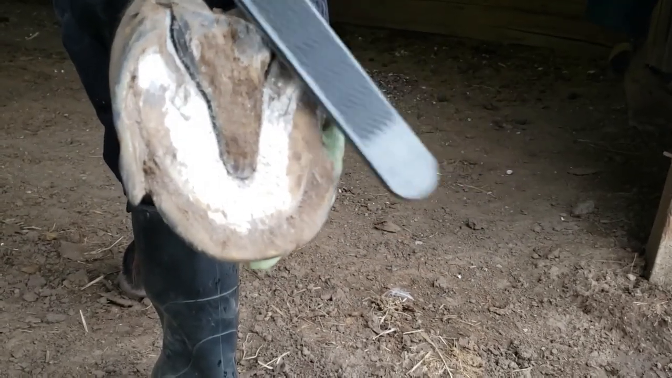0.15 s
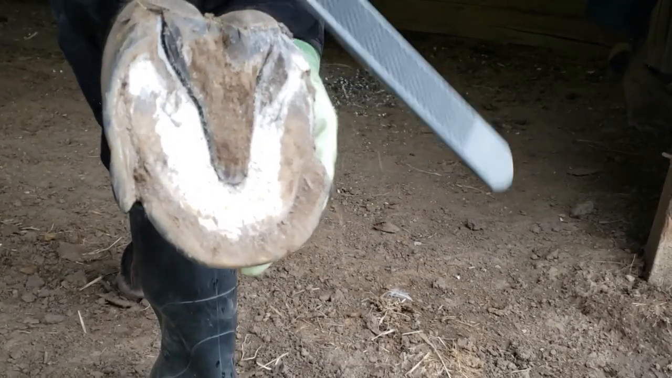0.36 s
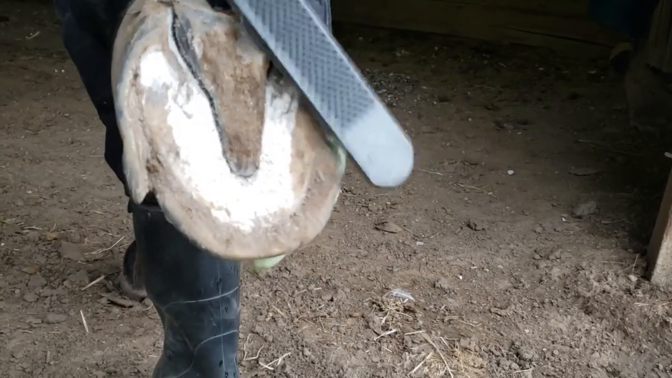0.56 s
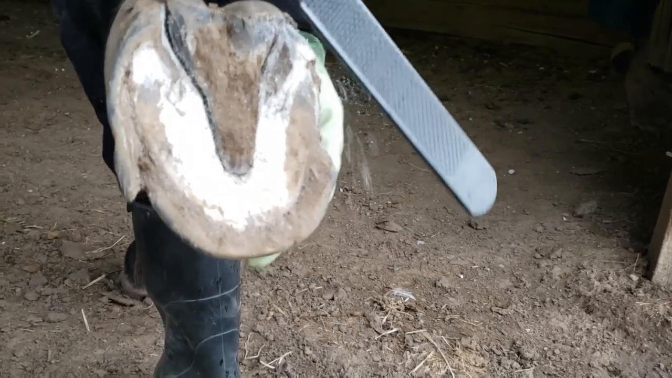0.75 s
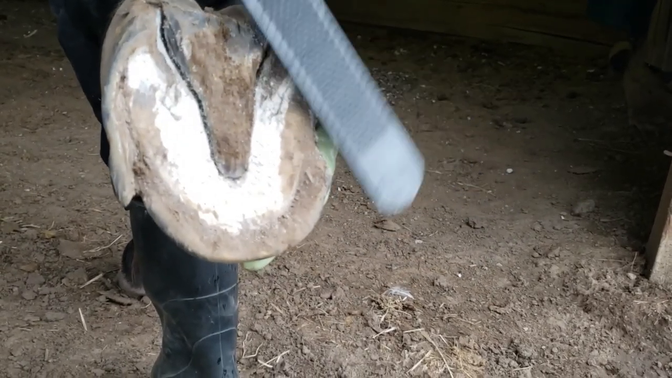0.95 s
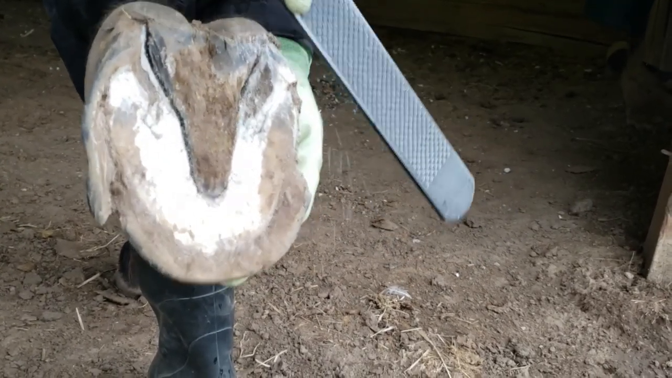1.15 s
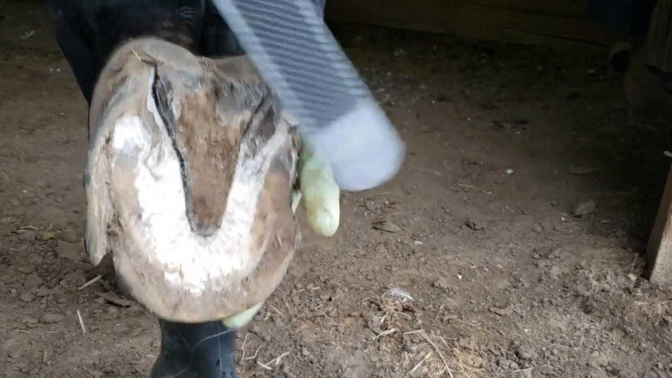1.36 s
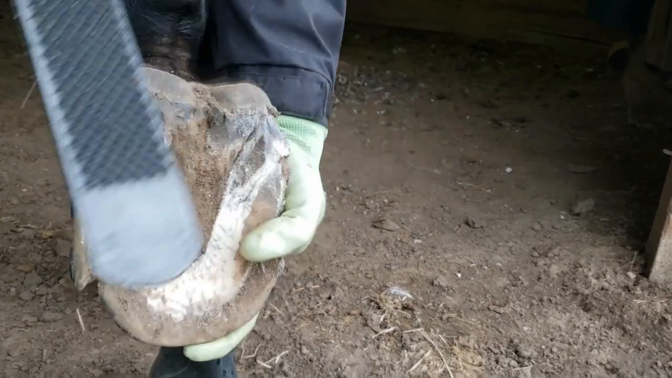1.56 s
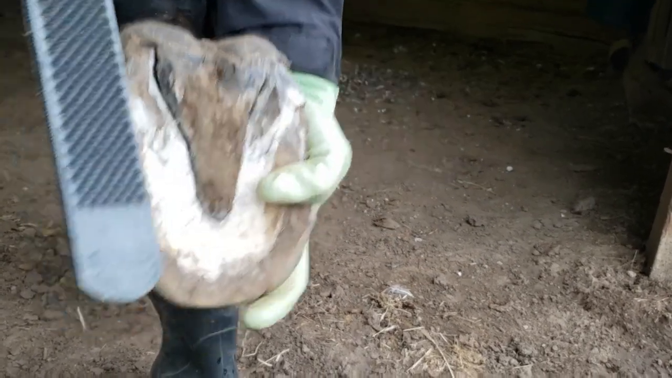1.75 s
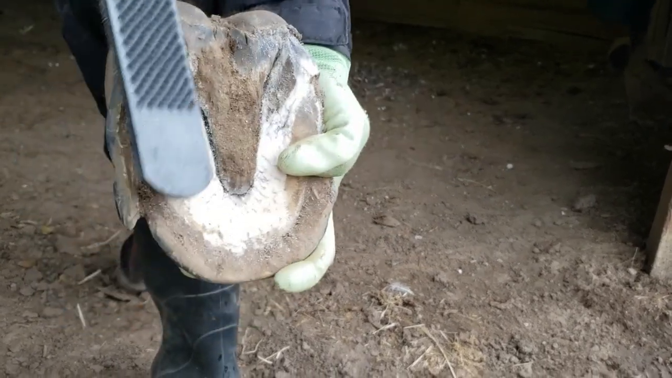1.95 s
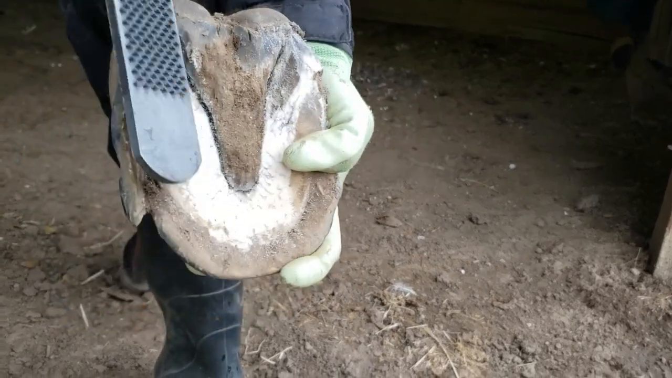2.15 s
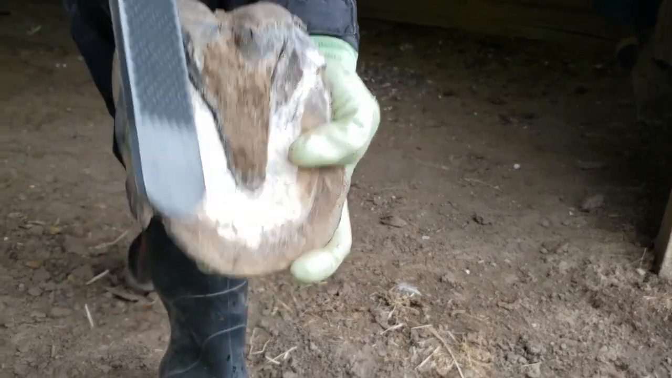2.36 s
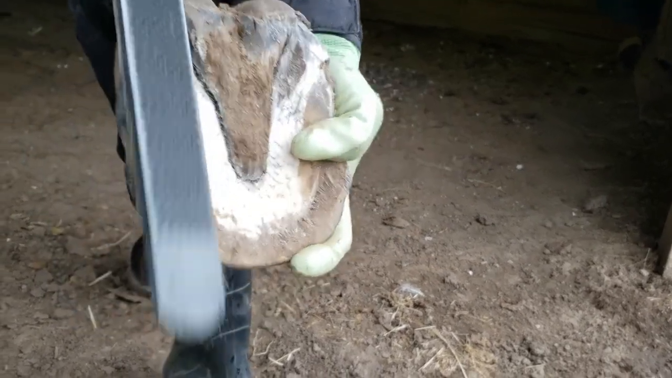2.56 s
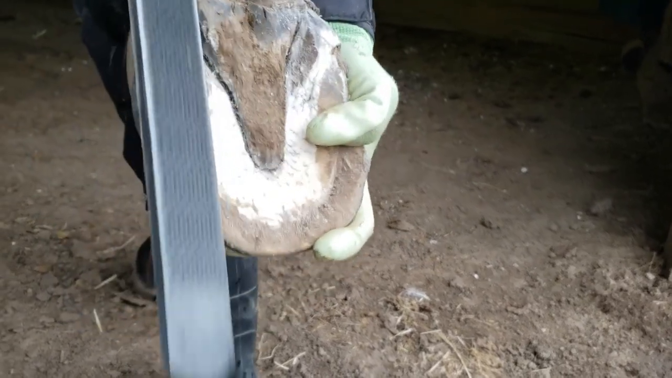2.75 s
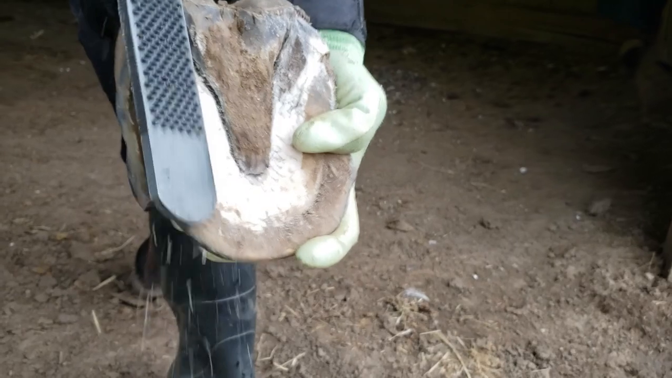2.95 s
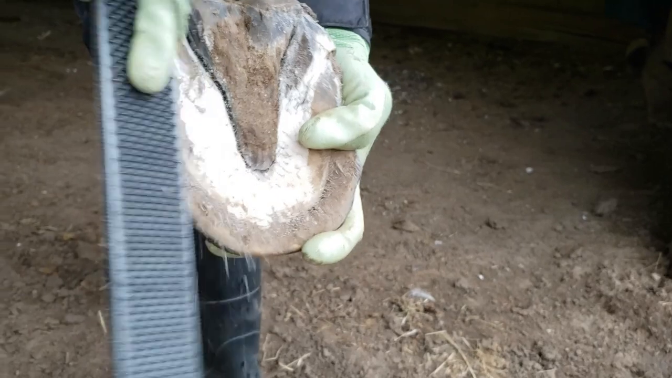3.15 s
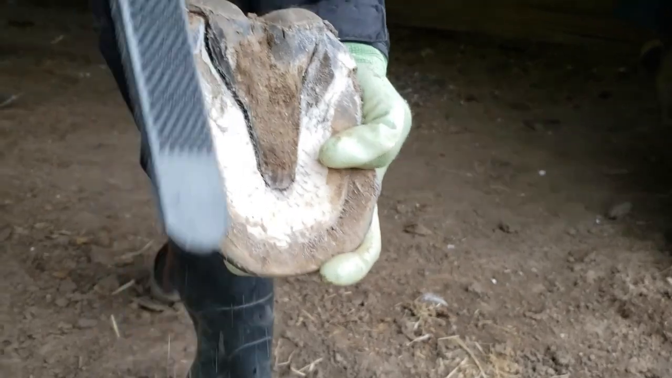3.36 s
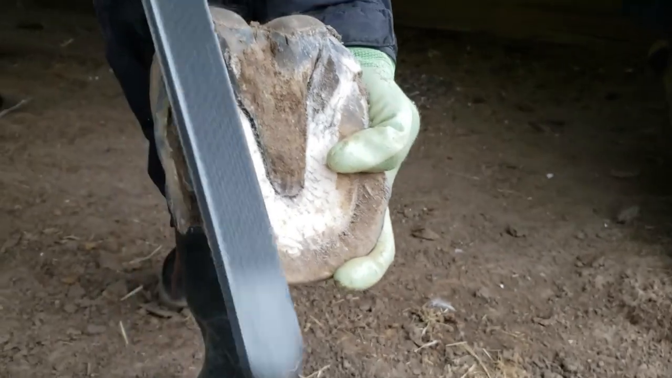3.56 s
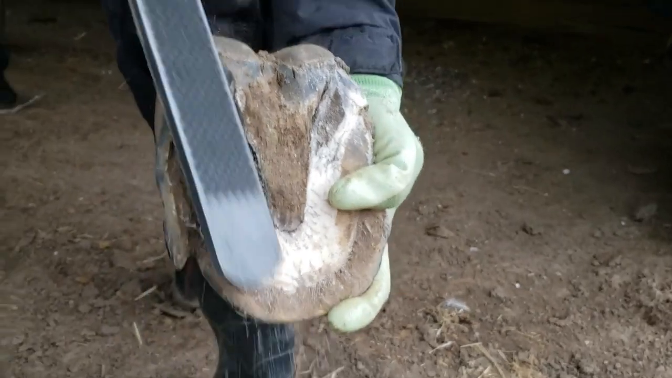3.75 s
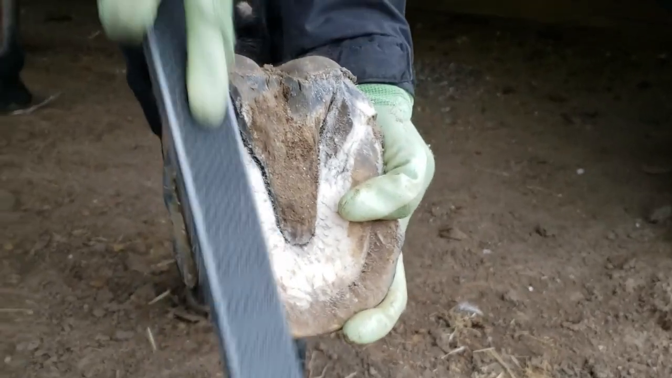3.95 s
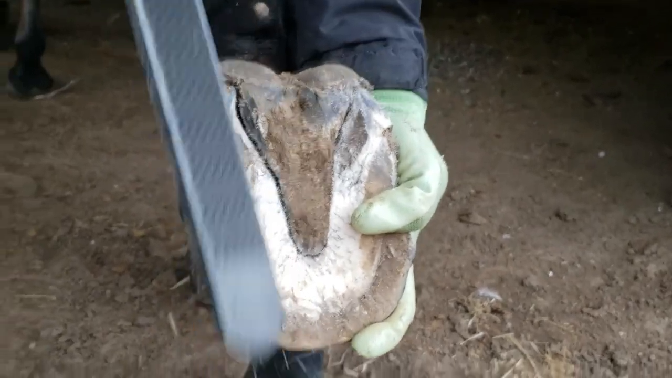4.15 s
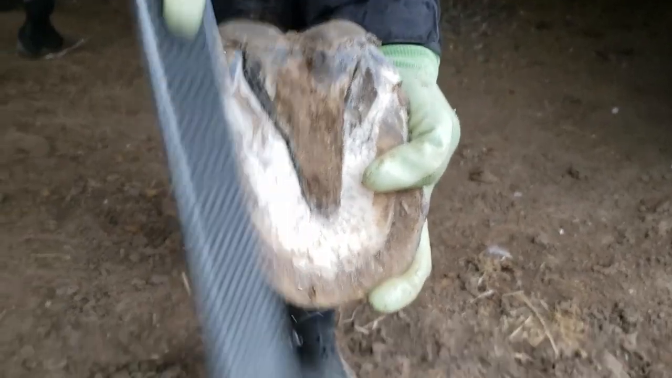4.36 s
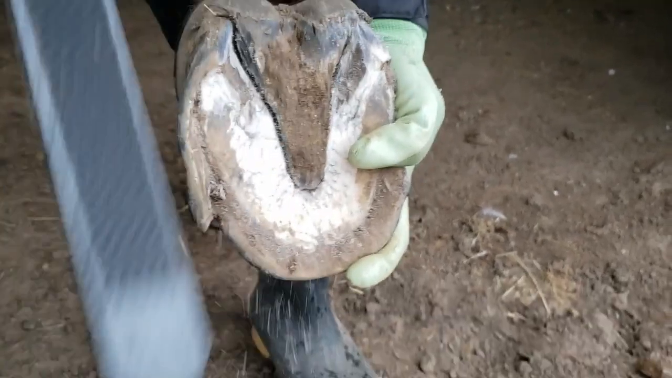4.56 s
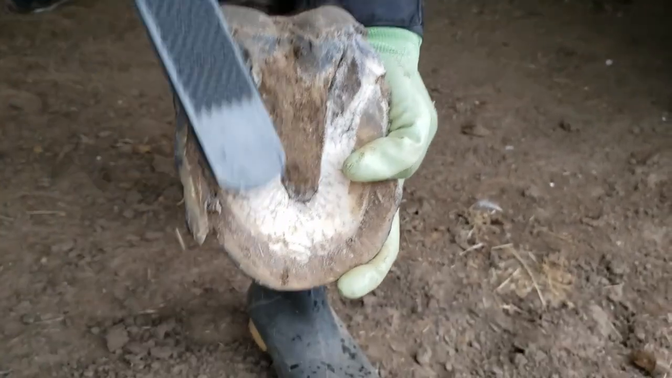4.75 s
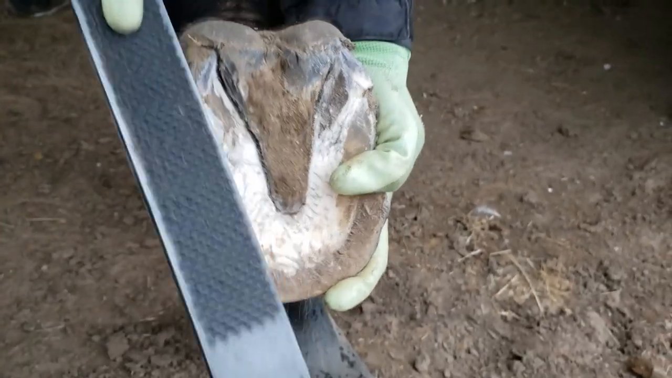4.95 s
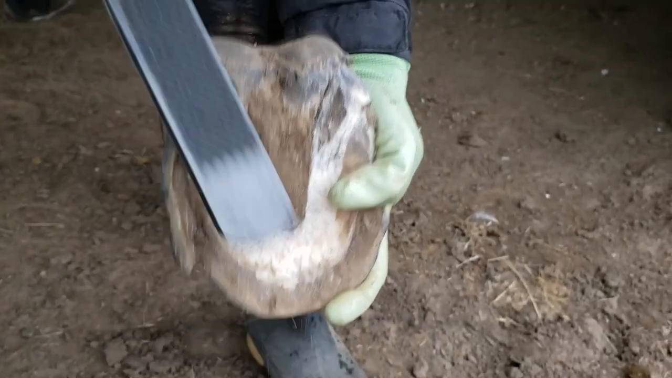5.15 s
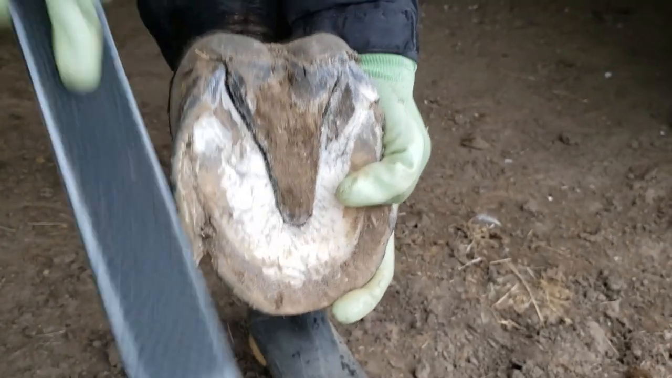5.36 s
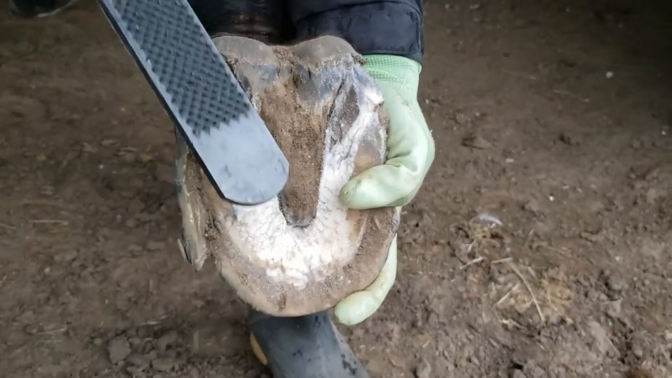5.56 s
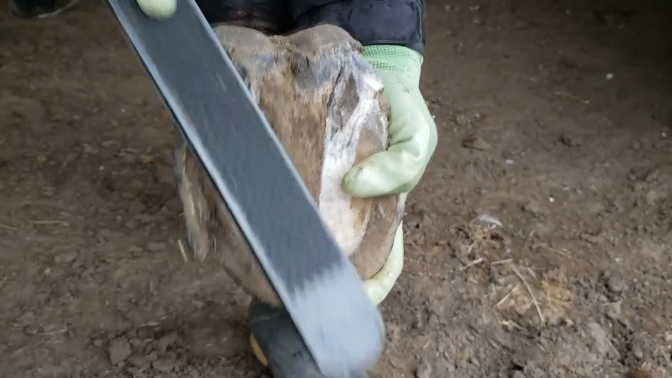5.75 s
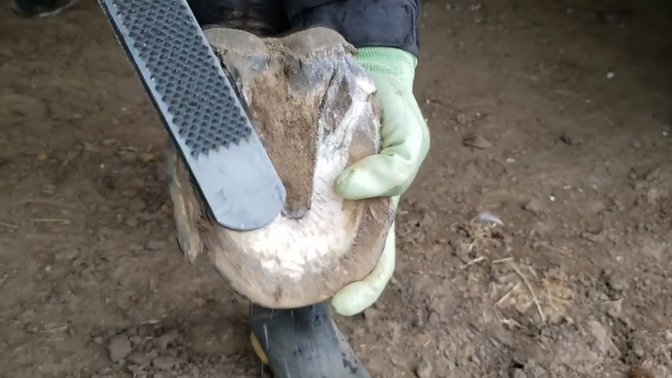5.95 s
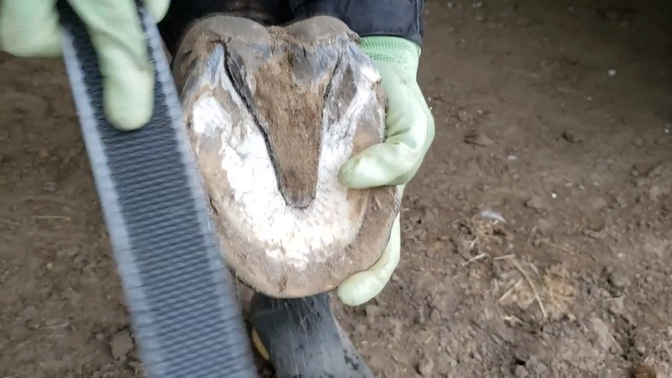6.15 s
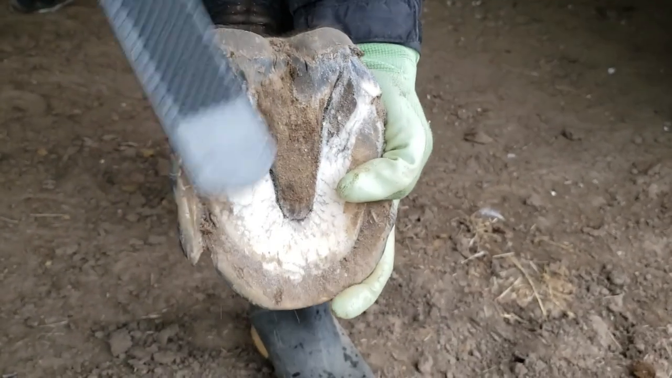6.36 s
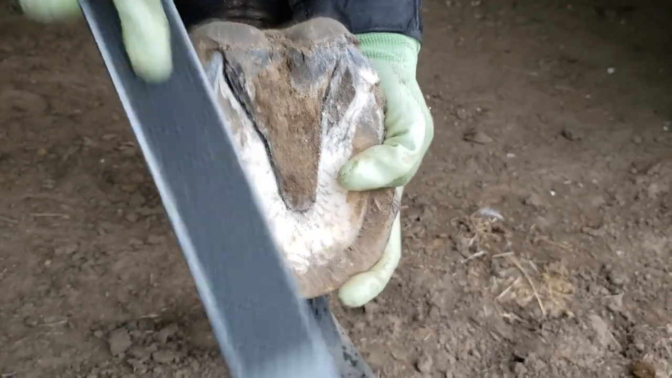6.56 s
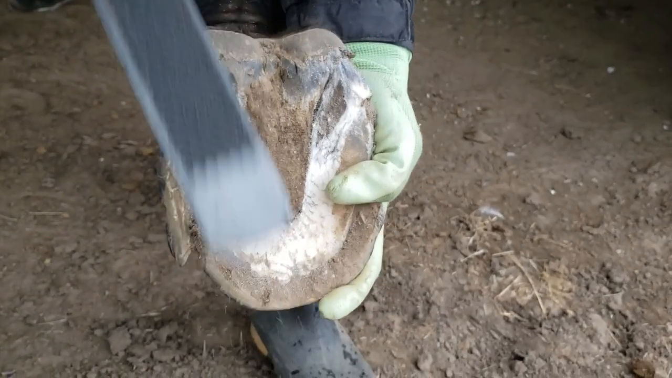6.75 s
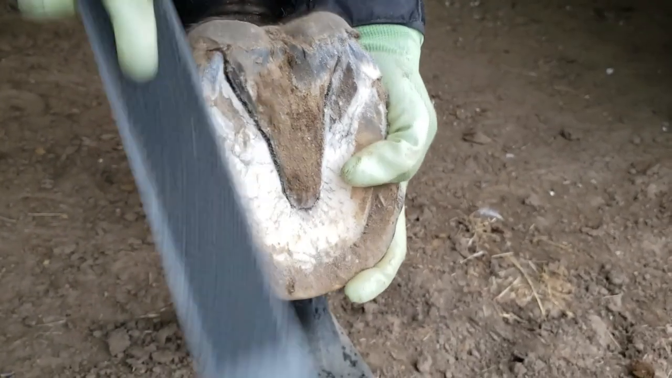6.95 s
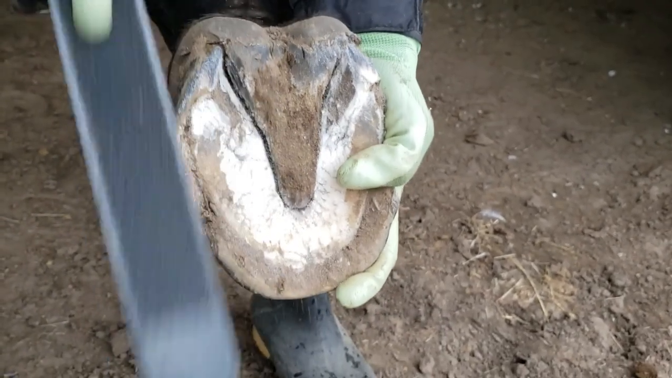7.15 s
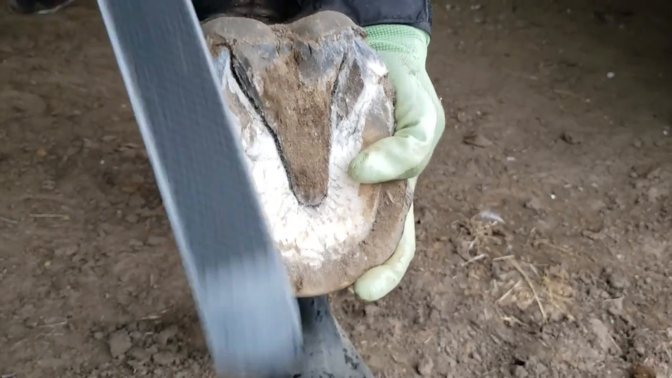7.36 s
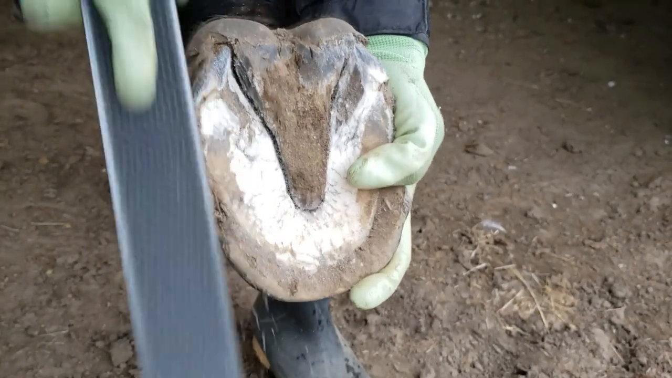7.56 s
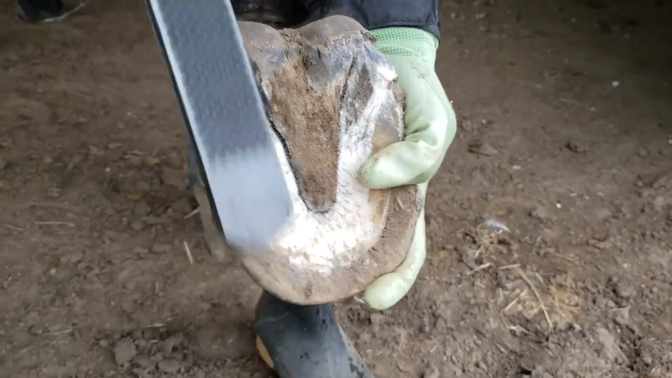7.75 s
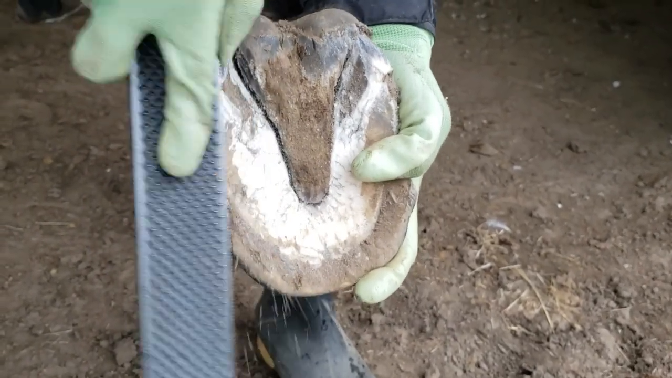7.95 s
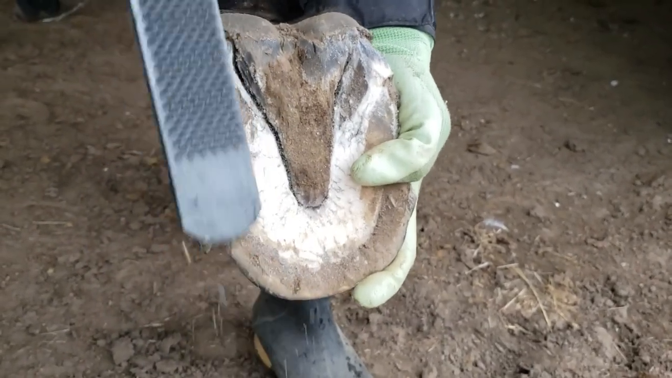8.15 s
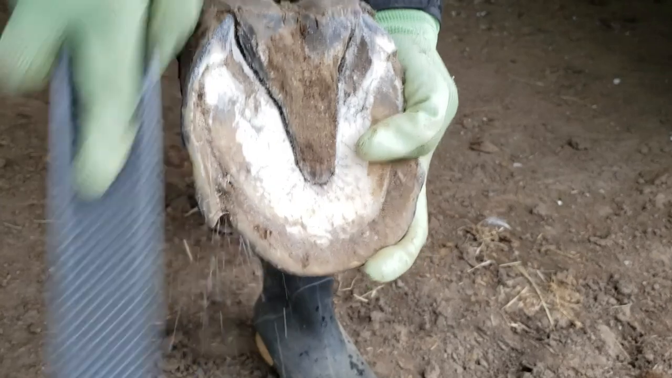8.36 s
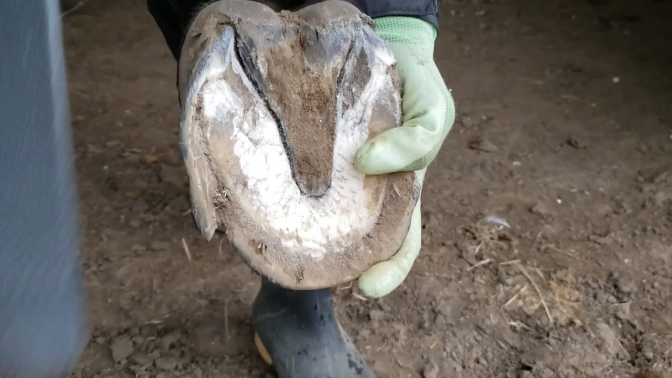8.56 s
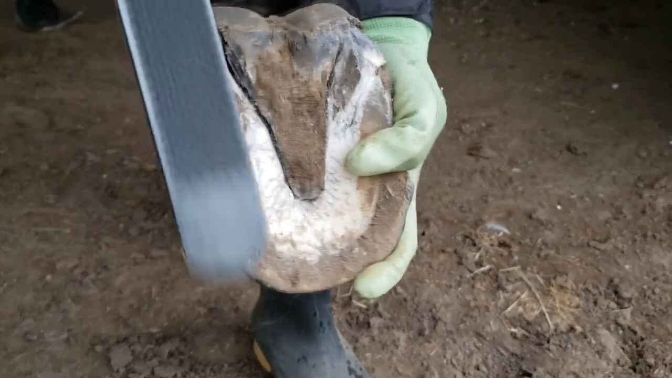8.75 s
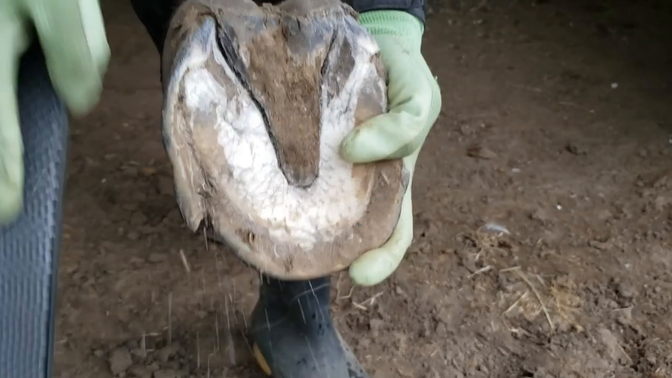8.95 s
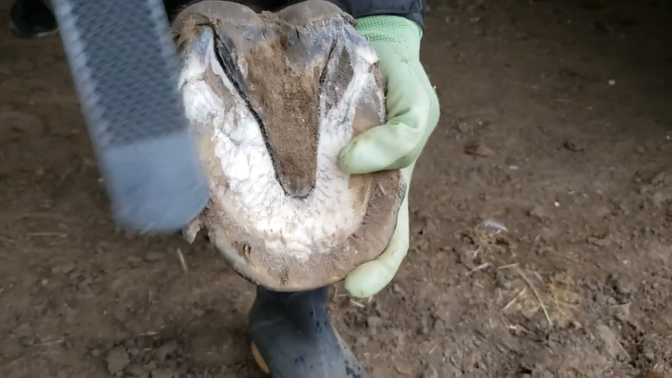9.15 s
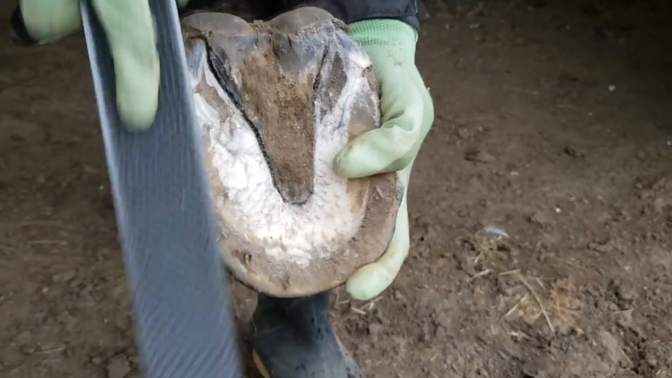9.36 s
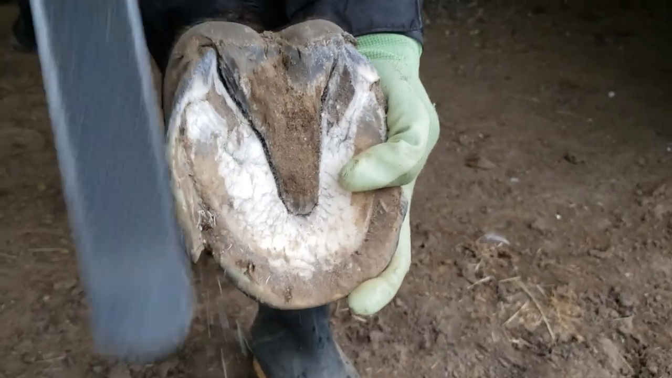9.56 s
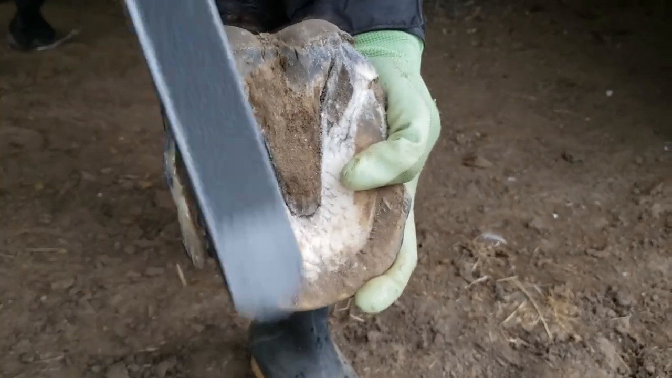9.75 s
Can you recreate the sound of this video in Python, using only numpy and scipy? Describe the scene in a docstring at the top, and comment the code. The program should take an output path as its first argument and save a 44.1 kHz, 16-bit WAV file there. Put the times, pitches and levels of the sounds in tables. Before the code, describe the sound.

A close stereo sound of a steel rasp working a horse's hoof in an open shelter, with a very short scattered tail and faint low outdoor rumble. From 0.15 to 1.2 seconds come three dull, grainy scrapes, chattering tooth by tooth, with light hissing returns and slight taps. From 1.2 to 2.3 only soft rubbing is heard as the rasp is turned, with a faint tick at 1.8. At 2.35 brighter strokes begin, quick and hissy with a thin steel ring, roughly three then two per second. From about 4.7 they deepen into loud, crunchy bites with hoof thud and metallic ringing, strongest around 5.2 to 7; knocks hit at 5.2 and, harder, near 6.9. Strokes continue steadily and slightly slower, with knocks at 8.6 and 9.1, the hardest crack at 9.2, and a last push near 9.8.

```python
"""Rasping a horse's hoof

A farrier files a hoof with a steel rasp, close to the microphone in an open shelter.
On each push the teeth bite: random fractures crumble the horn, caught tooth rows thud the hoof, the bar rings.
The draw back is mostly hiss from tooth tips. After three dull scrapes the rasp is turned over with soft rubbing.
Now and then it knocks on the hoof, ringing wall and bar; short scattered tails and low outdoor air surround it."""
import sys
import numpy as np
from scipy import signal
from scipy.fft import rfft, irfft
from scipy.io import wavfile
from scipy.ndimage import uniform_filter1d

SR = 44100
rng = np.random.default_rng(int(sys.argv[2]) if len(sys.argv) > 2 else 0)


def waveform_to_disk(signal):
    """Save audio, clipped to [-1, 1], as 16-bit WAV at the path in sys.argv[1]."""
    frames = np.transpose(np.atleast_2d(signal))
    scaled = np.clip(frames, -1, 1) * 32767
    samples = np.round(scaled).astype(np.int16)
    wavfile.write(sys.argv[1], SR, samples)


N = 432180
TIME = np.arange(N) / SR


def gain_of(db):
    """Decibels to amplitude."""
    return 10 ** (np.asarray(db) / 20)


def evened(x):
    """Scales to an rms of one."""
    return x / np.sqrt(np.mean(x ** 2) + 1e-20)


def wander(cutoff_hz):
    """Slow random curve of rms one: noise low-passed around cutoff_hz."""
    f_hz = np.fft.rfftfreq(N, 1 / SR)
    lowpass = 1 / (1 + (f_hz / cutoff_hz) ** 4)
    return evened(irfft(rfft(rng.standard_normal(N)) * lowpass, N))


def colour(x, points, size=4096):
    """Minimum-phase filter through (frequency_hz, gain_db) points."""
    point_hz, point_db = np.transpose(points)
    bin_hz = abs(np.fft.fftfreq(size, 1 / SR)) + 1
    log_gain = np.log(gain_of(np.interp(np.log(bin_hz), np.log(point_hz), point_db)))
    taps = np.fft.ifft(np.exp(np.conj(signal.hilbert(log_gain)))).real
    return signal.oaconvolve(x, taps[:size // 2])[:N]


def ring(x, mode_hz, width_hz):
    """One decaying mode; its gain passes white noise at equal power."""
    radius = np.exp(-np.pi * abs(width_hz) / SR)
    pole = radius * np.exp(2j * np.pi * mode_hz / SR)
    return signal.lfilter([np.sqrt(2 * (1 - radius * radius))], [1, -pole], x).imag


def ring_modes(drive, modes):
    """Sum of decaying modes (mode_hz, width_hz, level_db) under one drive."""
    return sum(gain_of(db) * ring(drive, hz, width) for hz, width, db in modes)


# one row a stroke, pushes timed; the draw before it starts where the last push ended:
# push_start_s, push_end_s, bite_db, pressure_place (0-1), pressure_length (0-1), rows_per_s,
# thud_db (re bite), ring_db (re bite), push_hiss_db, draw_hiss_db
STROKES = [(.152, .362, -45, 0.39, .22, 76, -2.5, -22, -44.5, -48.5),
           (.575, .815, -43.5, 0.34, .26, 78, -3.5, -19, -47.5, -50),
           (.995, 1.199, -47, 0.33, 0.21, 78, -2, -17, -52, -62),
           (2.353, 2.542, -51, 0.49, 0.49, 162, 1, 5.5, -39, -72),
           (2.689, 2.854, -48, 0.4, 0.43, 153, -1.5, 6, -41, -45),
           (2.992, 3.218, -48.5, 0.35, .6, 132, -6, 2, -39.5, -43.5),
           (3.48, 3.681, -49.5, 0.42, 0.56, 117, 3, 2, -42, -49),
           (3.85, 4.052, -44.5, 0.49, 0.35, 204, 3.5, -5.5, -40, -44.5),
           (4.275, 4.489, -49, 0.41, 0.37, 107, 2, 4, -40, -48),
           (4.748, 4.994, -41.5, 0.58, 0.24, 99.5, 6, 2, -40.5, -48),
           (5.172, 5.356, -34, 0.43, 0.19, 100, 1.5, 4.5, -37, -48.5),
           (5.602, 5.844, -43.5, 0.64, 0.2, 93.3, 5, 4, -42, -48),
           (5.994, 6.208, -35.5, 0.45, 0.23, 108.6, 2, 0.5, -37.5, -45),
           (6.433, 6.671, -36.5, 0.41, 0.23, 102, 6, 5, -37, -44.5),
           (6.868, 7.094, -36, 0.44, 0.29, 86, 3.5, 2, -36, -45.5),
           (7.31, 7.531, -40.5, 0.42, 0.32, 108.6, 2, -0.5, -36.5, -44),
           (7.748, 7.998, -43, 0.47, 0.44, 125, 2, 0.5, -38, -43.5),
           (8.209, 8.445, -39.7, 0.47, 0.18, 155, -3, 2, -33, -44),
           (8.713, 8.974, -43.5, 0.45, 0.3, 123, 0, 0.5, -37, -46),
           (9.218, 9.46, -45.5, 0.48, 0.43, 96, -1, 2.5, -38.5, -47),
           (9.704, 9.93, -43, .38, 0.29, 95, -1, 1, -40, -47)]
FIRST_DRAW_S = -0.07
# draw: the hand leans in towards its end; a quicker draw bites more
DRAW_S, DRAW_BITE_DB, QUICK_POWER, DRAW_PLACE, DRAW_LEAN = 0.21, -11, 2.4, 0.98, 0.96
DRAW_ROWS_PER_S, DRAW_THUD_DB, DRAW_RING_DB, DRAW_SCRAPE_DB = 125, -4, 0.5, -14
SCRAPE_DB = -5  # push scrape re its hiss


def passes():
    """Splits strokes into draws and pushes: start_s, end_s, hiss_db, bite_db, place, lean,
    rows_per_s, thud_db, scrape_db, ring_db."""
    rows, last_end_s = [], FIRST_DRAW_S
    for start_s, end_s, bite_db, place, lean, rate, thud_db, ring_db, push_db, draw_db in STROKES:
        quickness = DRAW_S / (start_s - last_end_s)
        draw_bite_db = draw_db + DRAW_BITE_DB + QUICK_POWER * 20 * np.log10(quickness)
        rows.append((last_end_s, start_s, draw_db, draw_bite_db, DRAW_PLACE, DRAW_LEAN,
                     DRAW_ROWS_PER_S, DRAW_THUD_DB, DRAW_SCRAPE_DB, DRAW_RING_DB))
        push_scrape_db = push_db - bite_db + SCRAPE_DB
        rows.append((start_s, end_s, push_db, bite_db, place, lean,
                     rate, thud_db, push_scrape_db, ring_db))
        last_end_s = end_s
    return np.array(rows)


# speed left at a turn, how soon full speed comes, pressure of a resting hand
CREEP, BRISK, RESTING = 0.04, 1.77, 0.06
USUAL_ROWS_PER_S, USUAL_BITE_DB = 110, -42
DAMPING_DB_PER_DB = 0.5024  # a harder bite damps the upper bar modes


def arm(hiss_power=1.0, press_power=0.39):
    """Speed and hand pressure along each pass set hiss, bite and the tone of the cut."""
    rows = passes()
    now = np.searchsorted(rows[1:, 0], TIME)
    start_s, end_s, hiss_db, bite_db, place, lean, *tone = rows[now].T
    along = np.clip((TIME - start_s) / (end_s - start_s), 0, 1)
    speed = CREEP + (1 - CREEP) * np.tanh(BRISK * np.sin(np.pi * along)) / np.tanh(BRISK)
    pressure = RESTING + (1 - RESTING) * np.exp(-((along - place) / lean) ** 2)
    damping_db = DAMPING_DB_PER_DB * (bite_db - USUAL_BITE_DB)
    hiss = gain_of(hiss_db) * speed ** hiss_power * pressure ** press_power
    bite = gain_of(bite_db) * speed * pressure
    return hiss, bite, tone + [damping_db]


def grains(per_s, spread_db):
    """Tiny fractures of random moment, sign and size."""
    sizes = gain_of(spread_db * np.clip(rng.standard_normal(N), -2, 2))
    return evened(sizes * rng.choice([-1, 1], N) * (rng.random(N) < per_s / SR))


def catches(rows_per_s, jitter=.09, spread_db=7.0, tear_s=0.0015):
    """Tooth rows catch and let go unevenly; each release tears horn for a moment."""
    rows = np.floor(np.cumsum(rows_per_s * (1 + jitter * wander(70))) / SR)
    sizes = gain_of(spread_db * np.clip(rng.standard_normal(N), -2, 1))
    kicks = (np.diff(rows, prepend=0) > 0) * sizes
    tearing = signal.lfilter([1], [1, -np.exp(-1 / (tear_s * SR))], kicks)
    centred_kicks = kicks - uniform_filter1d(kicks, size=800)
    return evened(centred_kicks), evened(tearing)


def bar(drive, modes, swing_db=6):
    """Each steel mode swells and fades at random as the contact slides over its nodes."""
    return evened(sum(gain_of(db + swing_db * np.tanh(wander(27))) * ring(drive, hz, width)
                      for hz, width, db in modes))


# spectra of crumbling horn and of the sharp scrape: frequency_hz, level_db (relative)
CRUMBLE = [(100, -11.5), (300, -4), (600, 4), (1050, -0.5), (1600, 3.5), (2200, 5), (3200, -2.5),
           (8200, -28), (15000, -22.5)]
SCRAPE = [(1500, -4.5), (3000, -3.5), (4500, 5.5), (7400, -10.5), (8200, -23), (9500, -55), (15000, 11)]
# modes of the hand-held hoof: mode_hz, width_hz, level_db (relative)
HOOF = [(104, 55, -23), (237, 40, -1.5), (290, 39, 0), (415.6, 62, 5.5), (1768, 110, 0)]
# modes of the steel bar in three bands; low and high also ring in knocks:
# mode_hz, width_hz, level_db (relative)
BAR_LOW = [(2487, 32, -4), (3343, 55, -3.5), (4317, 26, 2.5)]
BAR_MIDDLE = [(4990, 28, 0)]
BAR_HIGH = [(5315, 32, -4), (6168, 36, 1), (6370, 32, -1), (7397, 40, -4), (11390, 40, -11),
            (12440, 45, -13)]
# fast tooth rows wake the upper bands
MIDDLE_DB, MIDDLE_DB_PER_OCTAVE = -10.5, 11
HIGH_DB, HIGH_DB_PER_OCTAVE = -1, 4


def filing(bite, tone, dig_db=-50, crumble_db=-0.5, snap=0.98):
    """Fractures and row catches drive crumbling horn, hoof thud, scrape and bar ring."""
    rows_per_s, thud_db, scrape_db, low_db, damping_db = (uniform_filter1d(c, size=1000) for c in tone)
    octaves = np.log2(rows_per_s / USUAL_ROWS_PER_S)
    middle_db = low_db + MIDDLE_DB + MIDDLE_DB_PER_OCTAVE * octaves - damping_db
    high_db = low_db + HIGH_DB + HIGH_DB_PER_OCTAVE * octaves - damping_db

    kicks, tearing = catches(rows_per_s)
    depth = np.minimum(bite / gain_of(dig_db), 1)  # a light touch skates without digging in
    chatter = np.clip(depth * (78 / rows_per_s) ** 2, 0, .8)  # slow strokes catch row by row
    fractures = grains(5000, 4.1) * np.sqrt(1 - chatter + chatter * tearing ** 2)
    force = fractures + snap * chatter * kicks

    crumble = gain_of(crumble_db) * evened(colour(force, CRUMBLE))
    scrape = gain_of(scrape_db) * evened(colour(fractures, SCRAPE))
    thud = gain_of(thud_db) * evened(ring_modes(kicks + fractures / 2, HOOF))
    bands = ((low_db, BAR_LOW), (middle_db, BAR_MIDDLE), (high_db, BAR_HIGH))
    steel = sum(gain_of(db) * bar(force, modes) for db, modes in bands)
    return bite * (crumble + thud + np.sqrt(depth) * scrape + depth * steel)


# modes of the struck horn wall: mode_hz, width_hz, level_db (relative)
WALL = [(570, 97, -37), (974, 71, 7), (1289, 18, 6.5), (1500, 390, 16)]
# rasp knocking on the hoof: time_s, blow_db, steel_db (re blow)
KNOCKS = [(.167, -41, -24), (0.602, -45, -12), (1.027, -39, -26), (1.819, -44, -5), (4.743, -38, -8),
          (5.211, -29, -13), (5.243, -33, -11), (6.839, -28, 3), (6.956, -21.5, -5), (8.598, -33, -2.5),
          (9.111, -34, -12), (9.2053, -12, -17), (9.255, -25.5, -2.5)]
# repeats of a blow off legs and ground: delay_s, gain (re blow)
ECHOES = [(.0033, 0.54), (0.0108, 0.47)]


def knocks(crack_s=0.000065, tick_db=-16):
    """A short crack of steel on horn rings the hoof wall and the bar."""
    t_s = np.arange(SR // 4) / SR
    blows, steel_blows = np.zeros((2, N))
    for time_s, blow_db, steel_db in KNOCKS:
        at = round(time_s * SR)
        blows[at] = gain_of(blow_db)
        steel_blows[at] = gain_of(blow_db + steel_db)
    blows = blows + sum(gain * np.roll(blows, round(delay_s * SR)) for delay_s, gain in ECHOES)

    tick = gain_of(tick_db) * np.exp(-t_s / crack_s) * rng.standard_normal(len(t_s))
    impulse = t_s == 0
    wall = ring_modes(impulse, WALL)
    steel = ring_modes(impulse, BAR_LOW + BAR_HIGH)
    horn_sound = signal.oaconvolve(blows, wall / abs(wall).max() + tick)
    steel_sound = signal.oaconvolve(steel_blows, steel / abs(steel).max())
    return (horn_sound + steel_sound)[:N]


# spectrum of tooth tips on the sole: frequency_hz, level_db (relative)
HISS = [(300, -9.5), (1000, -2.5), (2500, -4), (4200, -0.5), (5500, -3.5), (7400, 0), (8200, -9.5),
        (9200, -1), (15500, -0.5)]


def sliding(hiss, flutter_db=1.42, direct_db=-2, left_db=-2, right_db=-5):
    """Tooth tips scratch the sole: one shared grain stream plus one for each side."""
    tips = np.array([evened(colour(grains(14000, 2.2), HISS)) for _ in range(3)])
    shared = gain_of(direct_db) * ports(tips[0])
    sides = gain_of([[left_db], [right_db]]) * tips[1:]
    return hiss * gain_of(flutter_db * wander(80)) * (shared + sides)


# soft rubbing while the rasp is turned over: time_s, level_db
TURNING = [(1.2, -69), (1.29, -56.5), (1.41, -50.5), (1.5, -55.5), (1.63, -51), (1.8, -58), (2.05, -64.5),
           (2.34, -64.5)]


def turning():
    """Strength of the rubbing as the rasp turns in the hand; silent outside the table."""
    return gain_of(np.interp(TIME, *np.transpose(TURNING), left=-np.inf, right=-np.inf))


# shading at the far microphone port: frequency_hz, gain_db
FAR_PORT = [(100, -2), (300, -3), (1200, -3.5), (2500, 1), (4300, -7.5), (8000, -19.5), (13000, -3.5)]
PORT_LAG = 8  # samples


def ports(x):
    """The right microphone port hears the source later and partly shaded."""
    return np.array([x, np.roll(colour(x, FAR_PORT), PORT_LAG)])


def shelter(direct, t60_s=0.19, wet_db=-7):
    """Ground, legs and close walls scatter a short decaying noise tail."""
    t_s = np.arange(SR // 2) / SR
    tail = rng.standard_normal((2, len(t_s))) * gain_of(-60 * t_s / t60_s)
    response = gain_of(wet_db) * tail / np.linalg.norm(tail[0])
    response[:, 0] = 1  # direct sound
    return signal.oaconvolve(direct, response, axes=1)[:, :N]


# spectrum of outdoor air: frequency_hz, level_db (relative)
AIR = [(20, -23.5), (40, -5.5), (55, 6.5), (100, -0.5), (160, -10.5), (400, -19), (600, -32.5),
       (1100, -30.5), (3000, -41.5), (15000, -41)]


def air(level_db=-52.0, apart=0.28):
    """Low outdoor rumble, slowly wandering in level and nearly the same at both ports."""
    shared, side = (evened(colour(rng.standard_normal(N), AIR)) for _ in range(2))
    return gain_of(level_db + wander(1.0)) * np.array([shared + apart * side, shared - apart * side])


def scene():
    """Rasp and hoof in the shelter, over the outdoor air."""
    hiss, bite, tone = arm()
    hoof = ports(filing(bite, tone) + knocks())
    rubbing = sliding(np.hypot(hiss, turning()))
    return shelter(hoof + rubbing) + air()


EDGE_HZ = 15900


def record(dry):
    """Limits the band with a steep linear-phase low-pass."""
    lowpass = signal.firwin(511, EDGE_HZ, window=("kaiser", 9), fs=SR)
    return signal.oaconvolve(dry, lowpass[None], "same")


dry = scene()
out = record(dry)
waveform_to_disk(out)
```